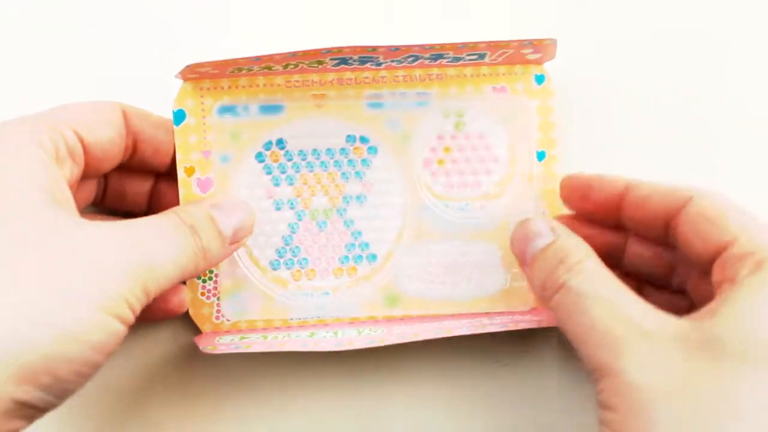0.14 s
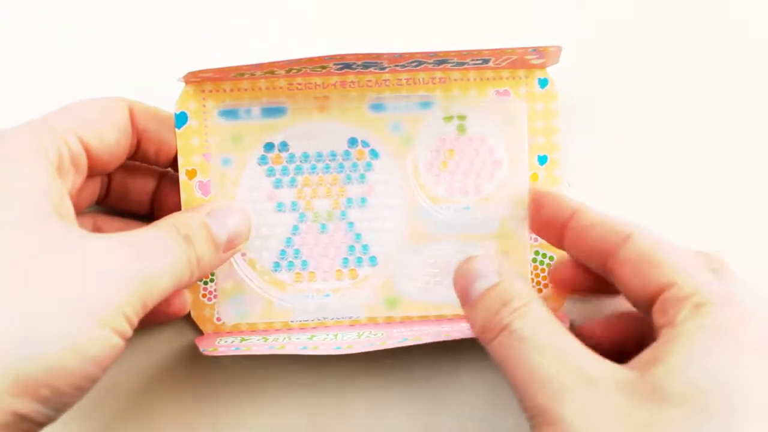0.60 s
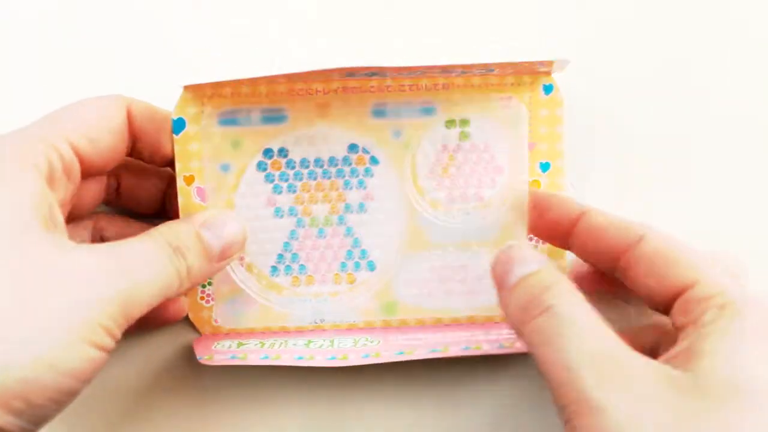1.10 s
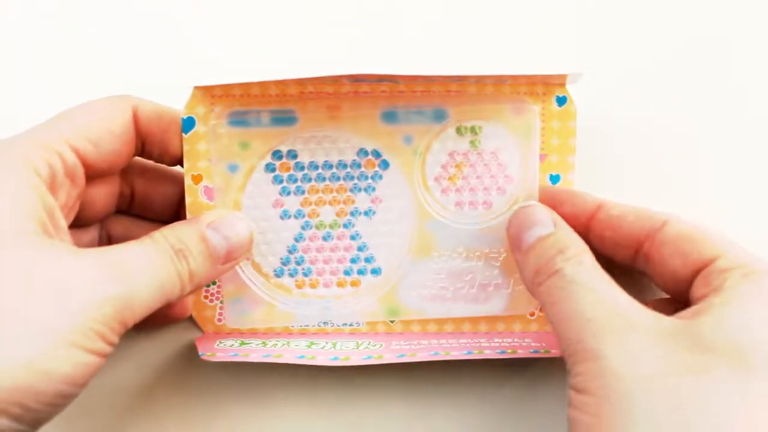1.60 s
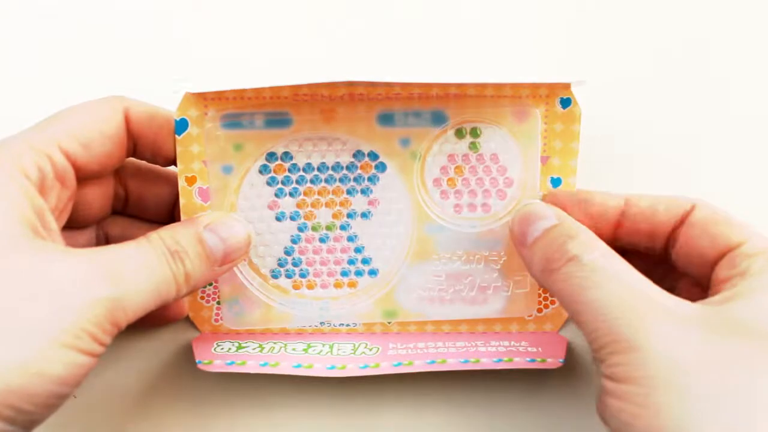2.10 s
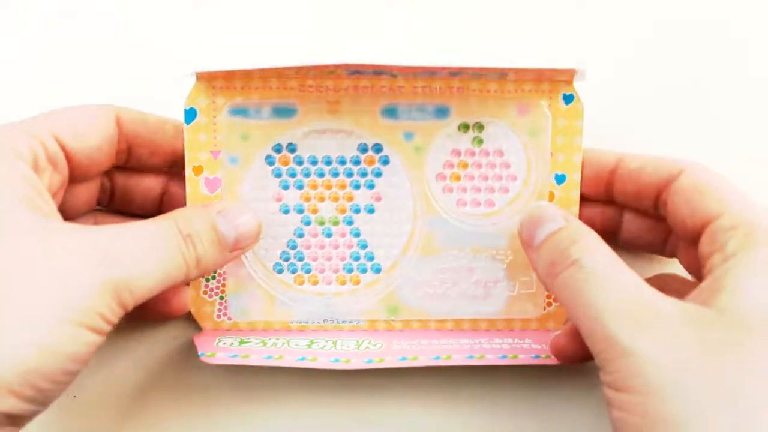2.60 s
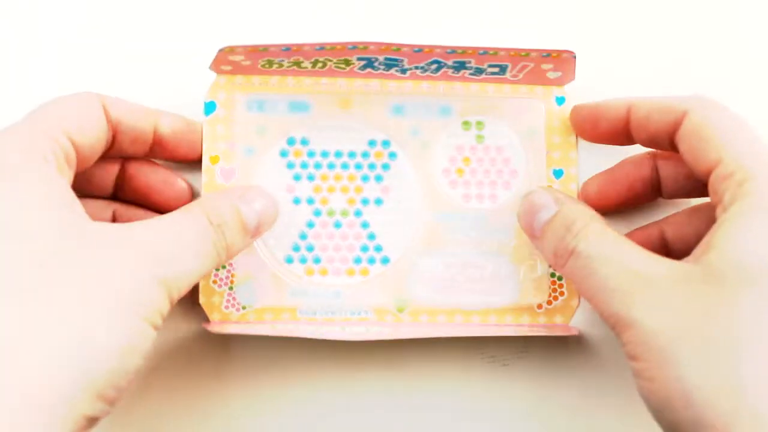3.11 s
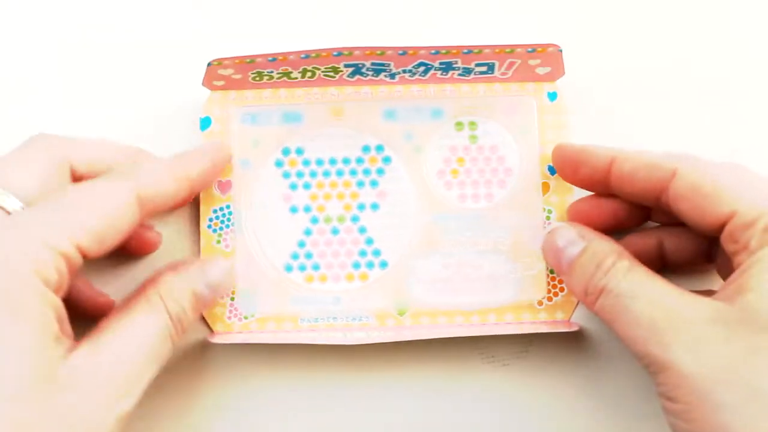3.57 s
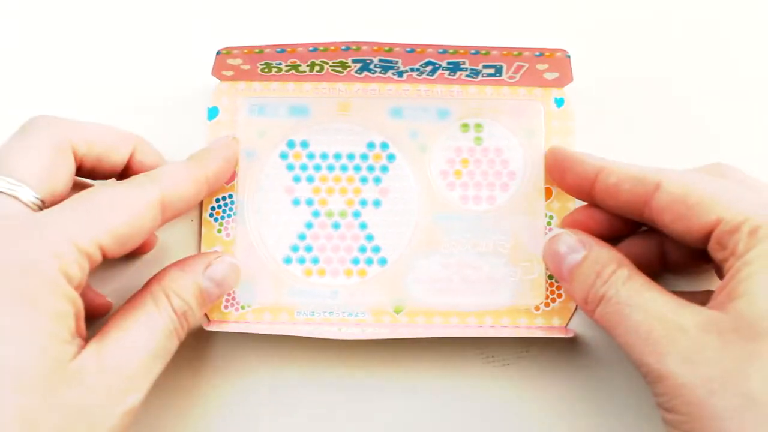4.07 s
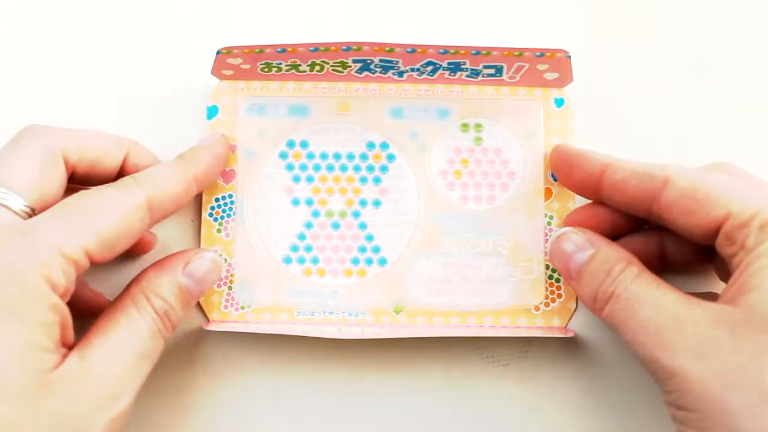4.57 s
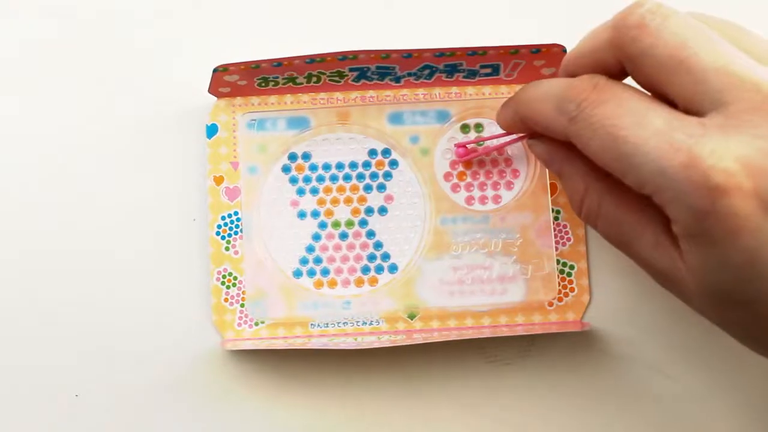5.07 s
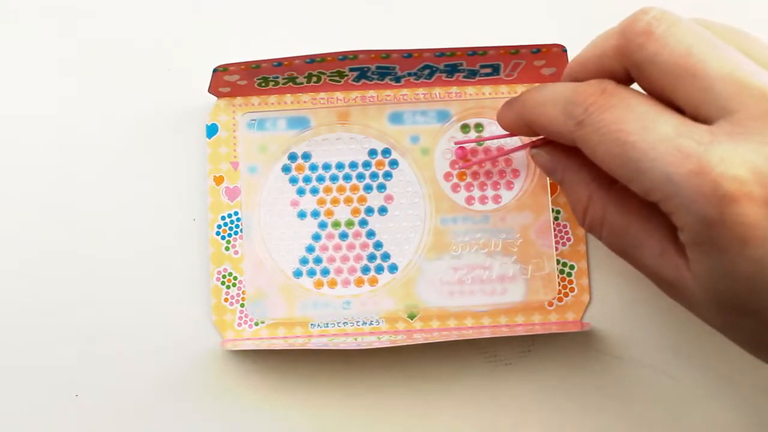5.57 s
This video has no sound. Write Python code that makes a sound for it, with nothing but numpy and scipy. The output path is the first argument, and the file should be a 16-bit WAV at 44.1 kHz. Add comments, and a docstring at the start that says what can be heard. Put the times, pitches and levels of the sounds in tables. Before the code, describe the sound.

Close-up in a small quiet room, hands press a thin plastic tray onto folded card. Irregular bright snaps and pops mix with short scrapes, skin rustle and soft knocks on the table, strongest between one and three seconds. Then it nearly stops, leaving faint hiss and tiny crackles, until tweezer tips tick thinly on the plastic at the end.

```python
"""Soft rustling over a faint hiss, a short scrape, then snap after snap: fingers press a thin plastic tray
onto a folded card in a small quiet room. Later, tweezer tips tick on the tray.
Snaps, scrapes and ticks are tiny slips that ring the tray; bumps are short, soft low tones.
The table echoes each snap closely, the room rings briefly, and filtered noise makes rumble and hiss.
Near the end the level dips for a moment."""
import sys
import numpy as np
from scipy import signal
from scipy.fft import rfft, irfft
from scipy.io import wavfile
from scipy.ndimage import uniform_filter1d

SR = 44100
rng = np.random.default_rng(int(sys.argv[2]) if len(sys.argv) > 2 else 0)


def pcm_store(signal):
    """Save signal as 16-bit PCM."""
    levels = np.round(np.clip(np.atleast_2d(signal), -1, 1) * 32767)
    wavfile.write(sys.argv[1], SR, levels.astype(np.int16).T)


def magnitude_from_level(level_db):
    """Linear magnitude for a level in decibels (20 dB per decade)."""
    exponent = np.asarray(level_db, float) / 20
    return 10 ** exponent


N = 250929   # length in samples

# Knuckle and card bumps on the table. Each row: start in seconds, strength of the push in dB,
# pitch of the push in Hz, strength of the rumble that follows in dB.
BUMP_EVENTS = [(0.316, -34.5, 664, -58), (0.329, -32, 746, -76), (0.726, -48, 220, -52.5),
               (1.222, -36.5, 215, -46.5), (1.937, -41, 272, -59), (2.096, -42, 199, -54),
               (2.222, -29, 550, -42.5), (2.578, -31.5, 456, -47), (2.878, -44.5, 395, -57),
               (3.069, -53, 276, -57), (3.211, -65, 300, -68), (4.217, -46, 520, -70)]


def rms_one(x):
    """Scale a sound so that its average power is 1."""
    return x / np.sqrt(np.mean(x ** 2) + 1e-20)


def at_hz(points, hz):
    """Read a table of (Hz, value) between its points, along log frequency."""
    table_hz, values = np.array(points)[:, 0], np.array(points)[:, 1]
    return np.interp(np.log(hz), np.log(table_hz), values)


def resonance(x, hz, width_hz):
    """One ringing mode: a two-pole band-pass with gain 1 on top; a narrow one rings longer."""
    r = np.exp(-np.pi * width_hz / SR)
    feedback = [1, -2 * r * np.cos(2 * np.pi * hz / SR), r * r]
    return signal.lfilter([(1 - r * r) / 2, 0, (r * r - 1) / 2], feedback, x)


def band(x, low_hz, high_hz):
    """Keep what lies between two frequencies (Butterworth band-pass)."""
    return signal.sosfilt(signal.butter(2, [low_hz, high_hz], "band", fs=SR, output="sos"), x)


def grains(shape, per_s, spread_db):
    """Surfaces slip at random moments, with random sign; a few slips are much larger than the rest."""
    draw = rng.random(shape + (3,))
    happens = draw[..., 0] < per_s / SR
    sign = np.sign(draw[..., 1] - 0.5)
    size = magnitude_from_level(-spread_db * np.log(1 - 0.99 * draw[..., 2]))
    return happens * sign * size


def tray(force, mode_hz, low_db, mid_db, high_db, favour_db, chance_db):
    """Each row of force rings the modes; the place where the sheet gives way sets how the energy is shared."""
    # Modes of the tray. Each row: frequency in Hz, width in Hz, share of the energy in dB.
    modes = [(770, 280, -3), (990, 370, 0.5), (1482, 238, 2), (1900, 488, 2), (2470, 440, 2.5),
             (2964, 550, 3.5), (3250, 375, 2), (3870, 630, 1.5), (4676, 275, -0.5), (4930, 590, -0.5),
             (6360, 1900, 4.5), (7540, 500, 3), (8470, 1270, 0), (10580, 1500, -2.5), (11850, 2400, -3),
             (14550, 670, -21)]
    luck = rng.standard_normal((len(force), len(modes)))
    out = 0
    for k, (hz, width_hz, share_db) in enumerate(modes):
        # how far this mode belongs to each region; the one near 1800 Hz is the reference
        low, _, mid, high = [at_hz(list(zip([900, 1800, 3700, 8000], one)), hz) for one in np.eye(4)]
        favoured = np.exp(-(np.log2(hz / mode_hz) / 0.28) ** 2)   # 0.28 octave
        colour_db = low * low_db + mid * mid_db + high * high_db
        gain = magnitude_from_level(share_db + colour_db + favoured * favour_db + chance_db * luck[:, k])
        ring = resonance(force + 1e-18, hz, width_hz)
        level = gain / np.linalg.norm(ring, axis=1)
        out = out + (-1) ** k * ring * level[:, None]   # neighbouring modes have opposite signs
    return out


def add(track, starts_s, rows):
    """Mix each row into the track at its time."""
    for s, row in zip(starts_s, rows):
        i = round(s * SR)
        part = row[max(-i, 0):N - i]
        track[max(i, 0):max(i, 0) + len(part)] += part
    return track


def hiss():
    """Room tone and microphone noise, shaped by frequency, with one faint whine of narrow noise."""
    # Colour of the noise. Each row: frequency in Hz, relative level in dB.
    noise_colour = [(18, -57.5), (30, -4), (64, -3), (210, 6.5), (374, -1), (584, -10), (649, 0),
                    (962, 2.5), (7270, -8.5), (7870, -9.5), (10500, -14.5), (14800, -17.5), (16000, -34)]
    noise_db, whine_db = -60, -81
    whine_hz, width_hz = 7870, 60
    hz = np.maximum(np.arange(N // 2 + 1) * SR / N, 1)
    spectrum = rfft(rng.standard_normal(N)) * magnitude_from_level(at_hz(noise_colour, hz))
    noise = rms_one(irfft(spectrum, N))
    once = resonance(rng.standard_normal(N), whine_hz, width_hz)
    whine = rms_one(resonance(once, whine_hz, width_hz))
    return magnitude_from_level(noise_db) * noise + magnitude_from_level(whine_db) * whine


def hands():
    """Skin creeps over card in fine grains, hissing as it slides; palms rumble on the table, more after a bump."""
    # Skin on card and hands on the table. Each row: time in seconds, rustle in dB, steady rumble in dB.
    movement = [(0.0, -54, -63.5), (0.17, -61, -63.5), (0.4, -55, -64.5), (0.66, -66.5, -63),
                (0.76, -53, -74), (0.9, -62, -68), (1.17, -56, -59.5), (1.31, -47.5, -78), (1.41, -49, -60),
                (1.57, -61, -66), (1.9, -60.5, -54.5), (2.199, -57, -56), (2.5, -57, -62),
                (3.0, -67.5, -65), (3.34, -64, -64.5), (4.61, -69, -64.5), (4.77, -61.5, -58.5),
                (4.83, -66.5, -66), (5.69, -64.5, -59.5)]
    treble_db, treble_follows = -73, 0.4   # the sliding hiss follows a part of the rustle's swing
    rise_s, fall_db_per_s = 0.008, -160   # rumble after a bump
    s, rustle_db, rumble_db = np.transpose(movement)
    t = np.arange(N) / SR
    rustle_db = np.interp(t, s, rustle_db)
    rumble_db = np.interp(t, s, rumble_db)

    creep = grains((1, N), per_s=2500, spread_db=3.5)
    rung = tray(creep, 2000, 4.5, 0.54, -13.0, favour_db=1.5, chance_db=1.0)[0]
    rustle = magnitude_from_level(rustle_db) * rms_one(rung)
    slide_db = treble_db + treble_follows * (rustle_db - rustle_db.mean())
    slide = magnitude_from_level(slide_db) * rms_one(band(creep[0], 3400, 22000))

    after = t[:SR // 2]
    shape = (1 - np.exp(-after / rise_s)) * magnitude_from_level(fall_db_per_s * after)
    shaken = add(np.zeros(N), np.array(BUMP_EVENTS)[:, 0], [magnitude_from_level(row[3]) * shape for row in BUMP_EVENTS])
    rumble = rms_one(band(rng.standard_normal(N), 203, 663))
    return rustle + slide + (magnitude_from_level(rumble_db) + shaken) * rumble


def scrapes():
    """Dense slips swell and stop: the sheet drags over card, or, in the very short stroke, a snap chatters."""
    # The stroke at 2.2264 s is a snap's chatter, the others are drags.
    # Each row: loudest moment in seconds, level there in dB, favoured mode in Hz,
    # strength of the modes near 8 kHz in dB, time scale of the swell in milliseconds.
    strokes = [(0.033, -38, 2780, 1, 12.6), (.091, -50, 2400, -10, 6.5), (.124, -48, 2200, -8, 11),
               (0.638, -52, 1680, -20, 84), (0.763, -37, 2760, -14, 13.6), (0.812, -48, 3270, -1.5, 33),
               (0.88, -50.5, 2800, -12, 26), (0.95, -60, 10700, 1, 170), (1.079, -46.5, 2480, -6, 30),
               (1.174, -41.5, 2500, -20, 8.8), (1.261, -42.5, 2840, -6, 23), (1.392, -37, 3300, 0, 13.3),
               (1.446, -40.5, 1480, -7, 11), (2.2264, -4, 3800, -5, 1.3), (2.719, -44.5, 3480, -7, 71),
               (2.845, -37.5, 2000, -11.5, 13), (2.873, -35.5, 1900, -11.5, 7.5),
               (2.919, -36, 2960, -10, 23), (3.014, -39, 1900, -6.5, 21), (3.062, -24.5, 2270, -12, 21),
               (3.212, -34.5, 2770, -5, 13.2), (4.419, -61.5, 3200, -10, 42)]
    s, rms_db, mode_hz, high_db, swell_ms = np.transpose(strokes)
    fade_ms = 0.41 * swell_ms   # it stops faster than it swells
    ms = np.arange(-6000, 6000) * 1000 / SR
    distance = np.where(ms < 0, -ms / swell_ms[:, None], ms / fade_ms[:, None])
    stroke = np.exp(-distance ** 1.27)
    slips = grains(stroke.shape, per_s=4000, spread_db=4.5)
    rings = tray(slips, mode_hz, -8, -1.9, high_db, favour_db=5.5, chance_db=2.5)
    rings = rings / rings.std(axis=1, keepdims=True) * stroke * magnitude_from_level(rms_db)[:, None]
    return add(np.zeros(N), s + ms[0] / 1000, rings)


def room(x):
    """The walls return a diffuse tail: octave bands of noise, each dying at its own rate."""
    # Each row: frequency in Hz, time to fall by 60 dB in seconds.
    decay_times = [(200, 0.17), (530, .38), (1400, 0.43), (3700, 0.32), (9700, 0.24)]
    level_db, delay_s = -11.5, 0.0025
    t = np.arange(30000) / SR
    tail = 0
    for hz in 125 * 2.0 ** np.arange(8):
        noise = band(rng.standard_normal(len(t)), hz / np.sqrt(2), min(hz * np.sqrt(2), 20000))
        tail = tail + noise * magnitude_from_level(-60 * t / at_hz(decay_times, hz))
    # silent up to the delay, fully in at twice the delay
    tail = tail * np.clip(t / delay_s - 1, 0, 1)
    tail = tail / np.sqrt(np.sum(tail ** 2))
    return magnitude_from_level(level_db) * signal.fftconvolve(x, tail)[:N]


def buckles():
    """The higher the favoured mode, the smaller the patch that gives way and the weaker the low modes."""
    # Buckles of the sheet. Each row: start in seconds, strength in dB, favoured mode in Hz, modes near
    # 3.7 kHz in dB, modes near 8 kHz in dB (both counted from the modes near 1.8 kHz).
    sheet_buckles = [(0.074, -23, 2400, 11, 4), (0.081, -28, 1860, 0, 4), (0.125, -29, 2980, -1, -8),
                     (0.231, -33, 2370, -4, -8), (0.2426, -11.5, 3850, 11, 5), (0.246, -15, 3850, 8, -14),
                     (0.317, -13, 2450, 2.5, 1), (0.33, -16.5, 2400, -4, -6), (0.434, -34.5, 1290, -3, -24),
                     (0.519, -31, 1020, -2, -26), (0.593, -34, 2400, -20, -15), (0.728, -15, 1280, -8, -17),
                     (0.739, -32, 1610, -18, -25), (0.893, -35.5, 1140, 0, -22),
                     (1.097, -37, 3050, -13, -17), (1.162, -35, 2150, -9, -10), (1.175, -23, 3360, 0, -4),
                     (1.181, -15, 3250, -2, 20), (1.184, -2.5, 3340, -5, -2.5), (1.228, -20, 1780, -7, -20),
                     (1.25, -24, 3020, -3, -11), (1.325, -33, 1580, -3, -6), (1.475, -5, 1470, 4.5, -13),
                     (1.514, -26, 1380, -11, -3), (1.673, -36, 1430, -24, -17),
                     (1.802, -37, 1610, -19, -27), (1.927, -17.5, 1770, -8, -16),
                     (1.937, -6, 1624, 0, -15.5), (2.097, -8.5, 2170, -14.5, -29),
                     (2.224, 2.5, 1054, 6, -9.5), (2.271, -17, 1510, -4, -6), (2.491, -29, 2130, -7, -17.5),
                     (2.536, -10.5, 1950, -8.5, -23), (2.577, -1, 1696, 1, -11),
                     (2.681, -25.5, 1680, -17, -16), (2.709, -32, 1760, -8, -2),
                     (2.824, -27.5, 1860, 0, -15), (2.847, -23.5, 1620, 3, -9), (2.861, -16, 1160, -9, -29),
                     (2.887, -24.5, 2560, 9, -1), (2.95, -24.5, 2320, -3, -17.5),
                     (2.966, -30, 2260, -3, -19), (3.035, -24, 2150, 10, -10),
                     (3.067, -11.5, 1690, -19, -8), (3.08, -13.5, 2400, 2, -6),
                     (3.222, -31.5, 2770, -7, -19), (3.834, -42, 2830, -5, -25), (3.923, -45, 2800, 0, -25),
                     (3.968, -42, 3200, 0, -27), (4.261, -41.5, 1770, -1, -15)]
    rows = []
    for s, db, hz, mid_db, high_db in sheet_buckles:
        low_db = -3.5 - 8 * np.log2(hz / 1440)   # modes near 0.9 kHz, 8 dB less per octave
        rows.append((s, db, hz, low_db, mid_db, high_db))
    return rows


def snaps():
    """A sudden release, then a few milliseconds of slips, rings the tray; the table returns it once, duller."""
    # each release: start, strength, then its colour: favoured mode, low, middle and high strength
    releases = buckles() + tweezers() + ticks()
    s, peak_db, *colour = np.transpose(releases)
    echo_s, echo_db = 0.003, -8
    ms = np.arange(1500) * 1000 / SR
    release = np.tile(1.0 * (ms == 0), (len(s), 1))
    slips = grains(release.shape, per_s=11000, spread_db=1.0) * np.exp(-(ms / 3.03) ** 3.3)
    kick = magnitude_from_level(15.0) * release
    rings = tray(kick + slips, *colour, favour_db=6.5, chance_db=1.77)
    lag = round(echo_s * SR)
    rings[:, lag:] += magnitude_from_level(echo_db) * band(rings, 400, 7000)[:, :-lag]

    # level each ring by its loudest short stretch (60 samples)
    height = np.sqrt(uniform_filter1d(rings ** 2, size=60).max(axis=1))
    rings *= (magnitude_from_level(peak_db - 9.5) / height)[:, None]

    # each snap opens with a sharp, short crack, softer when the release is dull
    crack = band(release, 1500, 5500)
    mid_db = colour[2]
    crack_db = peak_db - 3.5 + 0.7 * np.minimum(mid_db, 0)
    rings += crack / crack.max() * magnitude_from_level(crack_db)[:, None]

    # the walls get sound from all sides of the sheet: the same energy, without the ripple of one direction
    all_round = tray(release, *colour, favour_db=4.0, chance_db=2.3)
    all_round *= (np.linalg.norm(rings, axis=1) / np.linalg.norm(all_round, axis=1))[:, None]
    return add(np.zeros(N), s, rings), add(np.zeros(N), s, all_round)


def bumps():
    """A soft push rings card and table top for a few cycles; higher pushes die sooner."""
    t = np.arange(4000) / SR
    rise = 1 - np.exp(-t / 0.0014)
    rows = []
    for _, db, hz, _ in BUMP_EVENTS:
        tone = np.sin(2 * np.pi * hz * t)
        rows.append(magnitude_from_level(db) * tone * rise * np.exp(-t * hz / 2.84))
    return band(add(np.zeros(N), np.array(BUMP_EVENTS)[:, 0], rows), 110, 2920)


def ticks():
    """Fingers shift on the sheet: small patches give way faintly, at random moments."""
    # Spells of ticking. Each row: start in seconds, end in seconds, ticks per second.
    spells = [(.4, 3.15, 8), (3.55, 4.0, 18), (4.36, 4.45, 22), (5.46, 5.55, 30)]
    smallest_db, spread_db = -47.5, 4
    low_hz, high_hz = 2000, 3400   # range of the favoured mode
    rows = []
    for start, end, per_s in spells:
        count = round(per_s * (end - start))
        for when, size, place in rng.random((count, 3)):
            s = start + when * (end - start)
            db = smallest_db - spread_db * np.log(1 - 0.9 * size)
            hz = low_hz * (high_hz / low_hz) ** place
            rows.append((s, db, hz, -21.5, -5, -21.5))   # low, middle, high in dB
    return rows


def tweezers():
    """Tweezer tips strike the tray: thin ticks with very weak low modes."""
    # Each row: start in seconds, strength in dB, favoured mode in Hz.
    tips = [(5.4525, -17, 4350), (5.513, -39, 2300), (5.528, -26, 4300)]
    return [(*row, -37, 3, -11.5) for row in tips]   # low, middle, high in dB


def scene():
    """Everything handled sounds directly; snaps, scrapes and bumps also ring the room."""
    direct, all_round = snaps()
    handling = scrapes() + bumps()
    mix = direct + handling + room(all_round + handling) + hands() + hiss()
    # the whole level dips briefly
    dip_s, width_s, dip_db = 4.82, 0.004, -9
    t = np.arange(N) / SR
    dip = magnitude_from_level(dip_db * np.exp(-((t - dip_s) / width_s) ** 2))
    return (mix * dip)[None]


def roll_off(x):
    """The treble ends steeply here."""
    return signal.sosfilt(signal.butter(12, 16790, fs=SR, output="sos"), x)


def record(dry):
    """Whatever exceeds full scale is clipped flat."""
    mix = np.clip(dry, -1, 1)
    return roll_off(mix)


dry = scene()
out = record(dry)
pcm_store(out)
```